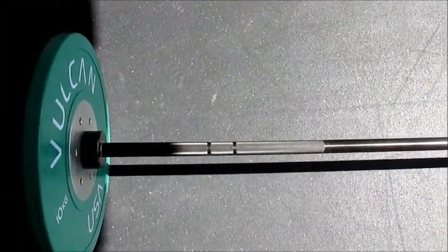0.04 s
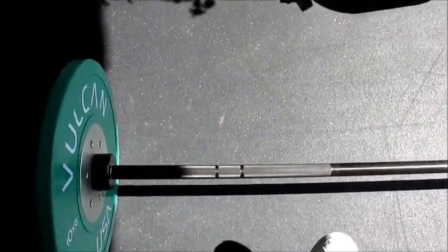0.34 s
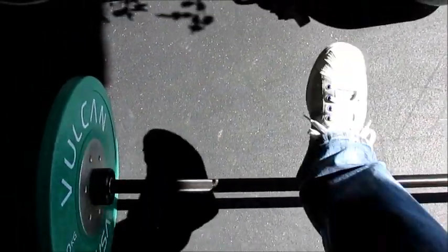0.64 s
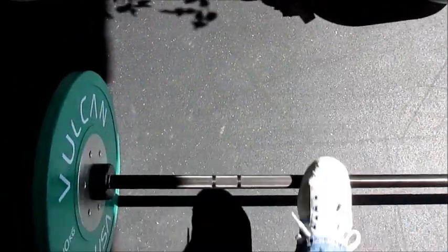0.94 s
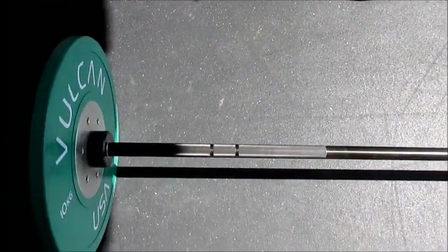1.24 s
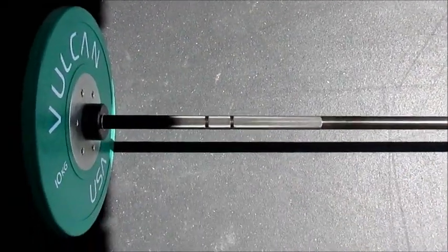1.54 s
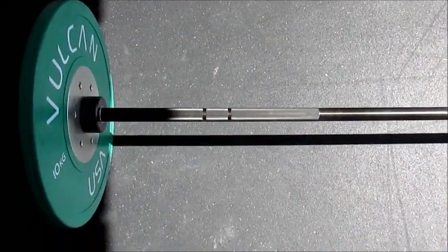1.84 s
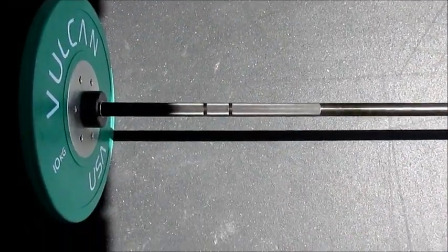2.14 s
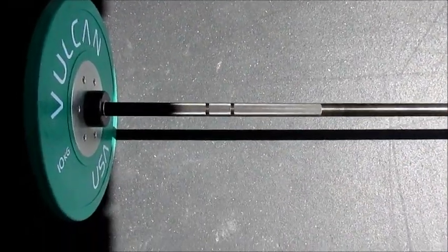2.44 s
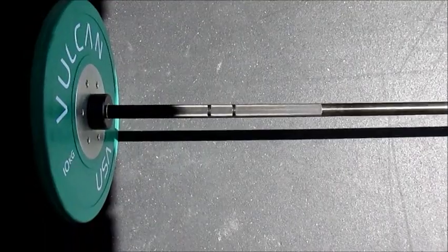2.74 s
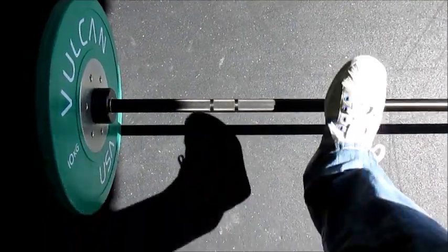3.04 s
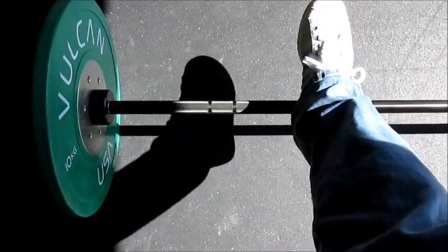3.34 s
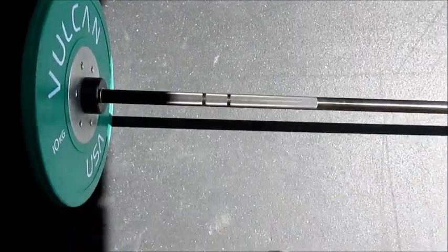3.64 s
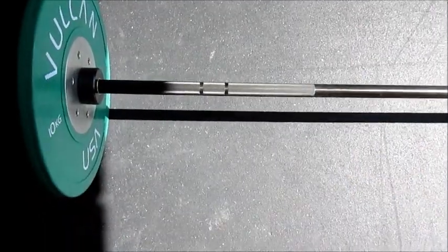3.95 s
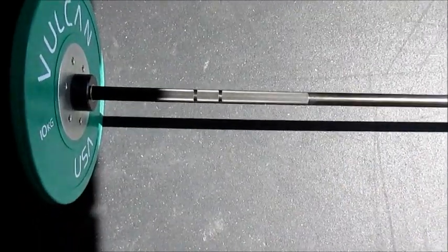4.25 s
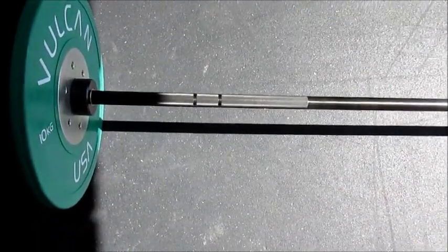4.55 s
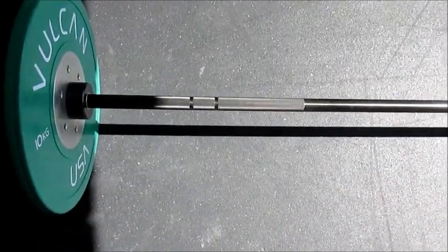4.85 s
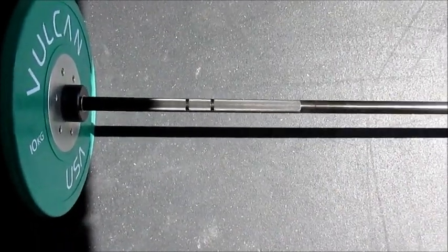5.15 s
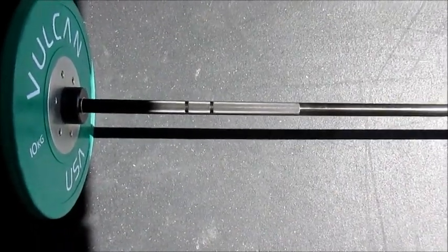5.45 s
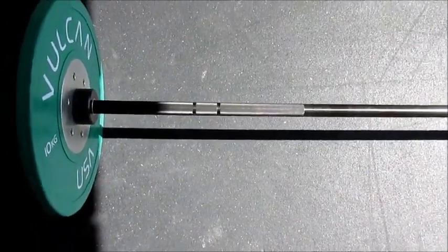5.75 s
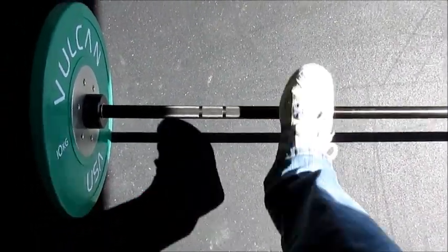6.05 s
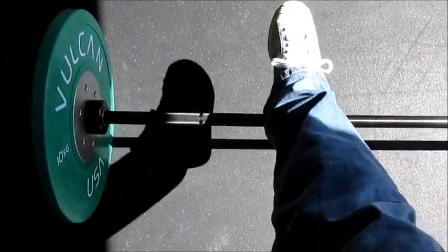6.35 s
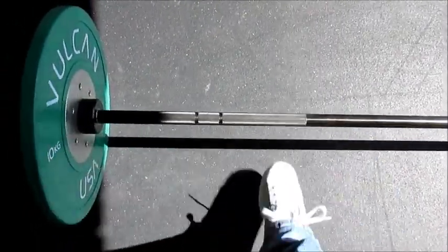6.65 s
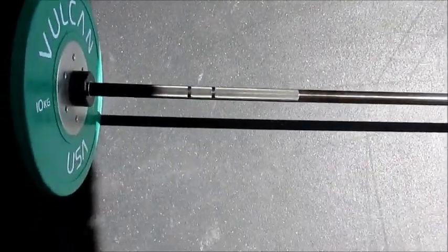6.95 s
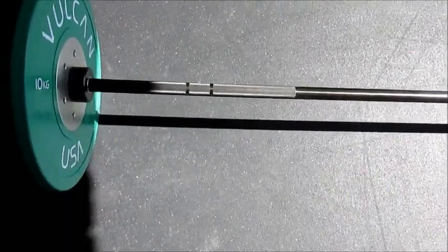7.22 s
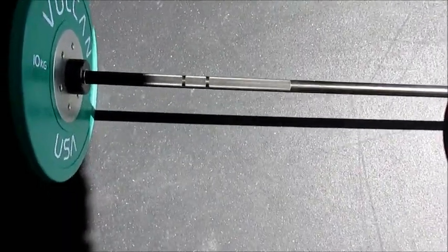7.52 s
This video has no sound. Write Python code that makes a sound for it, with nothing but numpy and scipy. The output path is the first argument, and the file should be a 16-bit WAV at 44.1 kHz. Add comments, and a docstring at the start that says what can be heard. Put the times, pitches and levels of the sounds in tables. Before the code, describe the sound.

A shoe spins a barbell's steel shaft three times, landing with a thud each time as the bearings whir, ring and slow down.

```python
"""A loaded barbell lies on a hard floor, shaft coasting; far motors drone under room noise and hum.
Light steps and a trouser swish lead in. At 0.8 s a shoe drags over the shaft, spins it up, slips off
and lands behind it, toe then heel. The bearings whir and ring the steel, duller and quieter as it slows.
Push and landing recur from 3.4 s and 6.4 s, with a few light taps from 3.3 s on."""
import sys
import numpy as np
from scipy import signal
from scipy.fft import rfft, irfft
from scipy.io import wavfile

SR = 44100
rng = np.random.default_rng(int(sys.argv[2]) if len(sys.argv) > 2 else 0)


def put_to_file(sound):
    """Save the sound as 16-bit audio at rate SR, in the file named by the first command-line argument."""
    columns = np.atleast_2d(sound).T  # one column per channel
    safe = np.clip(columns, -1, 1)
    whole_steps = np.round(safe * 32767)
    wavfile.write(sys.argv[1], SR, whole_steps.astype(np.int16))


N = 338688
TIME = np.arange(N) / SR
HZ = np.maximum(np.arange(N // 2 + 1) * SR / N, 1)

# diffuse sound at the ears: (frequency [Hz], coherence [-1..1])
EAR_COHERENCE = [(50, 0.63), (200, 0.93), (600, 0.61), (1100, 0.66), (1500, 0.069), (2000, 0.88),
                 (2800, -0.26), (5000, -0.22), (8000, 0.16), (14000, 0.099)]
# (frequency [Hz], relative density [dB])
ROOM_NOISE = [(12, -35), (20, -4), (85, -4.5), (119, -6.5), (140, -9.5), (153, -3), (175, -5), (196, -9),
              (282, -8.5), (416, -11), (932, -15.5), (4310, -29), (8640, -34), (15500, -38)]
# (frequency [Hz], level [dB])
HUM_TONES = [(120, -59), (170, -66)]
# (start [Hz], climb [Hz/s], top [Hz], base level [dB])
FAR_MOTORS = [(92, 3.65, 119, -58), (56.9, 5.5, 77, -56)]
# (frequency [Hz], half width [Hz], lift [dB])
ROOM_MODES = [(62.2, 3, 11.5), (73.4, 4.2, 11.5), (91.6, 4, 15.5), (102, 2.5, 12), (114.2, 2, 10)]
# shoe on shaft: (time [s], nudge length [s], nudged speed [0..1], coast length [s], hardness [dB])
PUSHES = [(-1.95, .2, .4, 2.54, -3.2), (.83, .14, .47, 2.51, .1), (3.405, .158, .25, 1.98, .2),
          (6.435, .18, .18, 2.78, -.2)]
# brief harder rattle: (peak time [s], hardness [dB])
RATTLE_SURGES = [(1.32, 1.5), (4.26, 2), (4.5, 1), (5.12, 1)]
# (band centre [Hz], gain per contact hardness [dB/dB])
HARDNESS_BANDS = [(120, -.4), (430, -.1), (750, .1), (1100, -.1), (1500, .3), (2000, .6), (2900, 1.1),
                  (4500, 1.28), (7000, 1.22), (12000, 1.22)]
# shaft and sleeves: (frequency [Hz], width [Hz], gain [dB], left-right [dB], left lead [rad])
SHAFT_MODES = [(413, 45, -9, 2, 0.0), (544, 34, -10, -3, 0.0), (738, 32, -9, 0, 0.1),
               (1022, 36, -5, 2, 0.5), (2230, 60, -10, -4, -0.4), (2890, 76, -.4, -4, -1.0),
               (3030, 110, -7, -3, 1.6), (3180, 70, -5, -1, -0.5), (3519, 30, -3, -5, 1.7),
               (3932, 34, -9, 0, -0.5), (4358, 42, -5.3, 3, -1.8), (4785, 35, -11, -1, -0.6),
               (5217, 45, -9.8, 4, 0.0), (5648, 20, -18, 10, -0.1), (6115, 22, -12, 10, -1.4),
               (6612, 33, -14, 3, 2.0), (7105, 40, -15, 2, -2.4), (7617, 40, -13, 4, -2.1),
               (8132, 19, -13, -1, -2.9), (8657, 16, -11, 0, -2.4), (9209, 22, -12, 6, -2.4),
               (9771, 18, -11, 2, -2.7), (10325, 22, -16, 0, -2.6), (10897, 17, -15, 4, -1.7),
               (11477, 17, -14, 1, -2.3), (12069, 22, -19, 0, -2.6), (12666, 31, -23, 2, -2.5),
               (13295, 45, -22, 2, -2.3), (13898, 40, -22, 3, -2.6)]
# broad radiation of sleeves and plates: (frequency [Hz], gain [dB])
PLATE_SPECTRUM = [(40, -16), (150, -8), (280, -12), (470, -6), (650, -15), (830, -10), (1080, 1),
                  (1900, -2.5), (2600, -9.5), (3500, -20.5), (6200, -26), (7300, -21), (8600, -27),
                  (10300, -22), (15000, -46)]
# (frequency [Hz], left-right [dB])
PLATE_BALANCE = [(500, -2), (1200, 2.5), (1600, -2.5), (2500, 5), (3500, 0), (5000, 18), (6000, 8),
                 (8500, 11), (14000, 6)]
# weight shifts: (time [s], level [dB])
LIGHT_STEPS = [(.412, -34), (.835, -28.5), (1.267, -19.5), (3.416, -26.5)]
# (time [s], toe level [dB], heel delay [s], heel level [dB], heel boom [dB])
SHOE_LANDINGS = [(1.0674, -6.5, .076, -6, -47), (3.668, -5.5, .053, -7.5, -25), (6.74, -9, .081, -3.5, -45)]
# (frequency [Hz], gain [dB], t60 [s])
FLOOR_RESONANCES = [(63, -39, .3), (103.3, -16.5, 0.24), (146.3, -2, 0.17), (160, -3.5, 0.051),
                    (214.3, -11, 0.42), (301.6, -17, 0.31), (436, -18.5, 0.17)]
# (peak time [s], level [dB], half length [s])
CLOTH_STROKES = [(.6, -65, .22), (3.15, -61, 0.2), (6.33, -59, 0.34)]
# (time [s], level [dB], centre [Hz], t60 [s])
SOLE_SCUFFS = [(.886, -26.5, 1810, 0.11), (.974, -23, 3000, .08), (1.018, -23, 3600, .05),
               (1.154, -25, 6000, 0.13), (1.165, -23, 800, 0.13), (6.699, -16, 700, 0.054),
               (6.75, -10.5, 3810, 0.046)]
# per landing: (delay [s], level [dB], centre [Hz], t60 [s])
SLAP_AND_RUMBLE = [(.003, -16.5, 746, 0.088), (.1, -22.5, 420, 0.55)]
# (time [s], level [dB], centre [Hz], t60 [s])
LIGHT_TAPS = [(3.262, -41.5, 1500, .17), (3.441, -38, 1100, .17), (5.609, -40, 1590, .36),
              (6.377, -37, 850, .11)]

KICK_S, PRESS_FADE_S, SURGE_HALF_S = .07, .15, .042
WHIR_GAIN_DB, DB_PER_SPEED_DECADE = -11.5, 15
HARDNESS_DB, REST_LOSS_DB, PRESS_DB = .14, 20, 1.5
TOP_TURNS_PER_S, TURN_DB, WANDER_DB, WANDER_HZ = 10, .61, .23, 12
STEP_HZ, STEP_T60_S, STEP_BOOM_DB = 272, .032, -38.5
TOE_HZ, TOE_T60_S, TOE_BOOM_DB = 313, .015, -11.5
HEEL_HZ, HEEL_T60_S = 350, .018
CUTOFF_HZ = 15700


def from_db(db):
    """Decibels to gain."""
    return 10 ** (np.asarray(db) / 20)


def unit_rms(x):
    """Scale to unit power."""
    return x / np.sqrt(np.mean(x ** 2) + 1e-20)


def over_hz(points):
    """Table interpolated over log frequency."""
    hz, value = np.transpose(points)
    return np.interp(np.log(HZ), np.log(hz), value)


def drift(rate_hz):
    """Unit-RMS random wander up to about rate_hz."""
    return unit_rms(irfft(rfft(rng.standard_normal(N)) / (1 + (HZ / rate_hz) ** 2), N))


def spread(pair):
    """Two independent spectra to left and right: alike in the bass, apart in the treble."""
    coherence = over_hz(EAR_COHERENCE)
    mid = np.sqrt((1 + coherence) / 2) * pair[0]
    side = np.sqrt((1 - coherence) / 2) * pair[1]
    return mid + side * [[1], [-1]]


def diffuse_noise(gain):
    """Unit-RMS stereo noise with the given spectral shape."""
    return unit_rms(irfft(spread(rfft(rng.standard_normal((2, N)))) * gain, N))


def decay(t, t60_s):
    """Exponential fall, 60 dB per t60_s."""
    return np.exp(-np.log(1000) * t / t60_s)


def bell(x, centre, half_width):
    """Gaussian of height 1."""
    return np.exp(-((x - centre) / half_width) ** 2)


def add(out, time_s, sound):
    """Mix in a short sound."""
    at = int(time_s * SR)
    out[..., at:at + sound.shape[-1]] += sound[..., :N - at]


def motor_notes():
    """Far motors speed up; standing waves swell each passing note. Rows: (pitch [Hz], level [dB])."""
    notes = []
    for start_hz, climb_hz_per_s, top_hz, db in FAR_MOTORS:
        hz = np.minimum(start_hz + climb_hz_per_s * TIME, top_hz)
        swell_db = sum(lift_db * bell(hz, centre, width) for centre, width, lift_db in ROOM_MODES)
        notes.append((hz, db + swell_db))
    return notes


def background(noise_db, waver_db, waver_hz):
    """Room noise plus slightly wavering motor and hum tones."""
    out = from_db(noise_db) * diffuse_noise(from_db(over_hz(ROOM_NOISE)))
    for hz, db in [*motor_notes(), *HUM_TONES]:
        phase = 2 * np.pi * np.cumsum(hz + waver_hz * drift(rate_hz=5.7)) / SR
        out += np.sqrt(2) * from_db(db + waver_db * drift(rate_hz=1.3)) * np.sin(phase)
    return out


def shaft_spin():
    """Nudge, kick to full speed, even braking by friction; speed sets whir gain and contact hardness."""
    speed, pressure, push_db = 1e-3, 0, 0
    for s, nudge_s, nudged_speed, coast_s, db in PUSHES:
        since_kick_s = TIME - s - nudge_s
        nudge = np.clip((TIME - s) / nudge_s, 0, 1)
        kick = np.clip(since_kick_s / KICK_S, 0, 1)
        coast = np.clip(1 - (since_kick_s - KICK_S) / coast_s, 0, 1)
        speed = np.maximum(speed, (nudged_speed * nudge + (1 - nudged_speed) * kick) * coast)
        pressure += kick * np.exp(-np.maximum(since_kick_s, 0) / PRESS_FADE_S)  # sole loads the bearings
        push_db += nudge * (db - push_db)
    turns = np.cumsum(speed) * TOP_TURNS_PER_S / SR
    surge_db = sum(db * bell(TIME, s, SURGE_HALF_S) for s, db in RATTLE_SURGES)
    chatter_db = TURN_DB * np.sin(2 * np.pi * turns) + surge_db
    whir_db = WHIR_GAIN_DB + DB_PER_SPEED_DECADE * np.log10(speed) + WANDER_DB * drift(WANDER_HZ)
    softening_db = REST_LOSS_DB * (1 - speed) ** 2
    return whir_db, HARDNESS_DB + push_db - softening_db + PRESS_DB * pressure + chatter_db


def rolling_contacts(rattle_db, rattle_hz, grit_db, grit_hz, flutter_db, flutter_hz):
    """Three force spectra: countless tiny impacts that bunch up, and soften as the shaft slows."""
    whir_db, hardness_db = shaft_spin()
    bunching = unit_rms(from_db(rattle_db * drift(rattle_hz) + grit_db * drift(grit_hz)))
    force = rng.standard_normal((3, N)) * bunching
    hardness_db += flutter_db * drift(flutter_hz)  # shifting load
    centres_hz, shares = np.transpose(HARDNESS_BANDS)
    out = 0
    for share, one_hot in zip(shares, np.eye(len(shares))):
        band = np.interp(np.log(HZ), np.log(centres_hz), one_hot)
        out += band * rfft(force * from_db(whir_db + share * hardness_db))
    return out


def shaft_response():
    """Steel resonances with steep skirts, each with its own level and phase per side."""
    out = 0
    for hz, width_hz, db, pan_db, lead_rad in SHAFT_MODES:
        detuning = (HZ ** 2 - hz ** 2) / (HZ * width_hz)
        mode = from_db(db) / ((1 + 1j * detuning) * (1 + 1j * detuning / 8))
        left = from_db(pan_db / 2) * np.exp(.5j * lead_rad)
        out += np.array([[left], [1 / left]]) * mode
    return out


def bearings(shaft_gain_db):
    """Rolling contacts drive the broadband plates and the narrow shaft modes."""
    force = rolling_contacts(rattle_db=.8, rattle_hz=60, grit_db=2.2, grit_hz=500,
                             flutter_db=.6, flutter_hz=25)
    pan_db = over_hz(PLATE_BALANCE) * [[.5], [-.5]]
    plates = spread(force[:2]) * from_db(over_hz(PLATE_SPECTRUM) + pan_db)
    shaft = force[2] * shaft_response() * from_db(shaft_gain_db)
    return irfft(plates + shaft, N)


def footsteps(band_hz):
    """A rubber sole thuds and sets the floor booming: light steps, toes, heels."""
    footfalls = [(s, db, STEP_HZ, STEP_T60_S, STEP_BOOM_DB) for s, db in LIGHT_STEPS]
    for s, toe_db, delay_s, heel_db, heel_boom_db in SHOE_LANDINGS:
        footfalls.append((s, toe_db, TOE_HZ, TOE_T60_S, TOE_BOOM_DB))
        footfalls.append((s + delay_s, heel_db, HEEL_HZ, HEEL_T60_S, heel_boom_db))
    out, t = np.zeros(N), TIME[:SR // 2]
    boom = sum(from_db(db) * np.sin(2 * np.pi * hz * t) * decay(t, t60_s)
               for hz, db, t60_s in FLOOR_RESONANCES)
    for s, db, hz, t60_s, boom_db in footfalls:
        add(out, s, -from_db(db) * np.sin(2 * np.pi * hz * t) * decay(t, t60_s))
        add(out, s + .5 / hz, from_db(boom_db) * boom)  # floor yields once the sole is flat
    return signal.sosfilt(signal.butter(2, band_hz, "band", fs=SR, output="sos"), out)


def room_tail(x, gain_db, t60_s, wall_hz):
    """Short diffuse reverberation, dulled by the walls."""
    tail = rng.standard_normal((2, N)) * decay(TIME, t60_s) * (TIME > .008)
    response = spread(rfft(unit_rms(tail) / np.sqrt(N))) / (1 + 1j * HZ / wall_hz)
    return from_db(gain_db) * irfft(rfft(x) * response, N)


def rubbing(strokes, centre_hz, half_width_oct):
    """Uneven friction hiss, one swell per stroke: (peak time [s], level [dB], half length [s])."""
    hiss = diffuse_noise(1 / (1 + (np.log2(HZ / centre_hz) / half_width_oct) ** 4))
    swell = sum(from_db(db) * bell(TIME, s, half_s) for s, db, half_s in strokes)
    return hiss * swell * from_db(1.8 * drift(rate_hz=25))


def trouser_swishes():
    """A trouser leg swings over the bar."""
    return rubbing(CLOTH_STROKES, centre_hz=8800, half_width_oct=.62)


def sole_rubs(nudge_gain_db, kick_db):
    """Rubber drags over the knurling twice per push: nudge, scaled by its speed, then kick."""
    strokes = []
    for s, nudge_s, nudged_speed, *_ in PUSHES:
        strokes.append((s + .65 * nudge_s, nudge_gain_db + 20 * np.log10(nudged_speed), .46 * nudge_s))
        strokes.append((s + nudge_s + KICK_S / 2, kick_db, .3 * KICK_S))
    return rubbing(strokes, centre_hz=4300, half_width_oct=1.5)


def bursts(rows, rise_s, half_width_oct, crack=0):
    """Decaying band noise per row; crack adds height to the first instant."""
    out, t = np.zeros((2, N)), TIME[:SR // 2]
    for s, db, hz, t60_s in rows:
        edges_hz = [hz / 2 ** half_width_oct, min(hz * 2 ** half_width_oct, CUTOFF_HZ)]
        band = signal.butter(2, edges_hz, "band", fs=SR, output="sos")
        noise = unit_rms(signal.sosfilt(band, rng.standard_normal((2, len(t)))))
        envelope = (decay(t, t60_s) + crack * decay(t, t60_s=.0088)) * (1 - np.exp(-t / rise_s))
        add(out, s, from_db(db) * noise * envelope)
    return irfft(spread(rfft(out)), N)


def sole_scuffs():
    """The sole catches on bar or floor; each landing adds a slap and a hollow rumble."""
    landings = [(s + delay_s, db, hz, t60_s)
                for s, *_ in SHOE_LANDINGS for delay_s, db, hz, t60_s in SLAP_AND_RUMBLE]
    return bursts([*SOLE_SCUFFS, *landings], rise_s=.003, half_width_oct=.75)


def sole_slips(lead_s, level_db, half_s):
    """The sole zips off the steel just before landing."""
    strokes = [(s - lead_s, level_db, half_s) for s, *_ in SHOE_LANDINGS]
    return rubbing(strokes, centre_hz=6600, half_width_oct=.8)


def taps():
    """Light, sharp taps with a short ring."""
    return bursts(LIGHT_TAPS, rise_s=.0002, half_width_oct=1.4, crack=1.2)


def scene():
    """Dry bearings, foot sounds with room tail, background."""
    foot = sole_scuffs() + taps() + sole_slips(lead_s=.0039, level_db=-19.5, half_s=.0075)
    foot += trouser_swishes() + sole_rubs(nudge_gain_db=-37.5, kick_db=-40)
    foot += footsteps(band_hz=(50, 1210))
    whir = bearings(shaft_gain_db=8)
    tail = room_tail(foot, gain_db=-6.5, t60_s=.35, wall_hz=4100)
    return whir + foot + tail + background(noise_db=-45, waver_db=.5, waver_hz=.81)


def record(dry):
    """Soft peak limit, steep low-pass."""
    rounded = dry / (1 + (dry / .8) ** 4) ** (1 / 4)
    return signal.sosfilt(signal.ellip(10, .1, 90, CUTOFF_HZ, fs=SR, output="sos"), rounded)


dry = scene()
out = record(dry)
put_to_file(out)
```